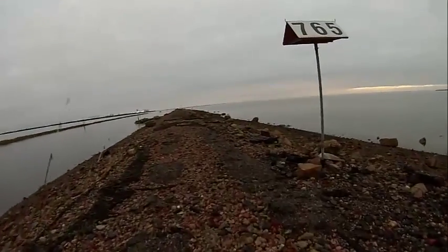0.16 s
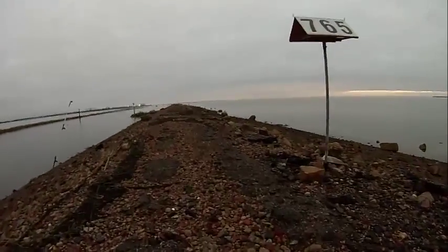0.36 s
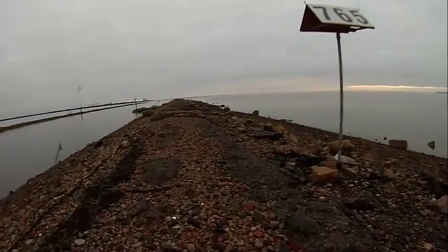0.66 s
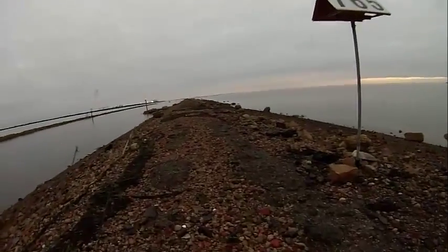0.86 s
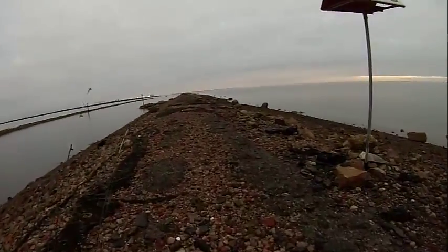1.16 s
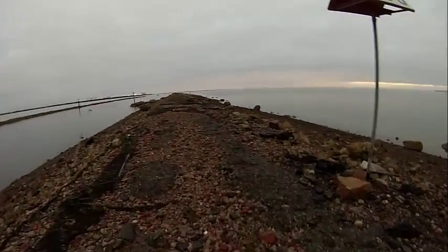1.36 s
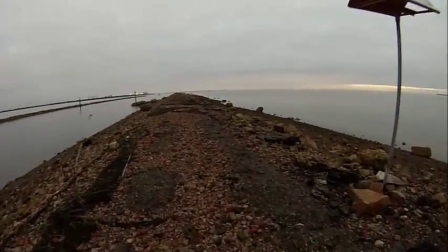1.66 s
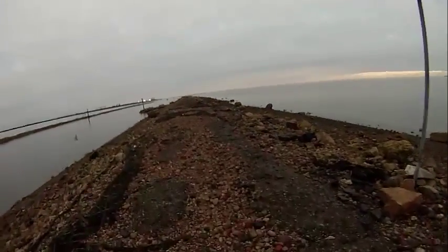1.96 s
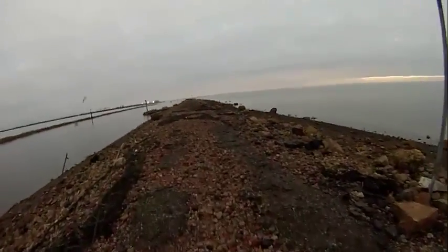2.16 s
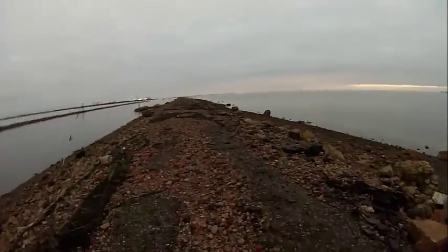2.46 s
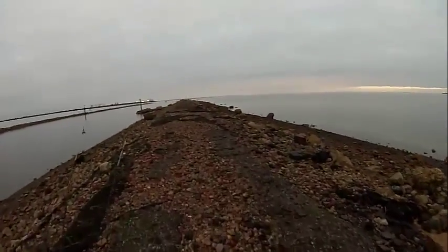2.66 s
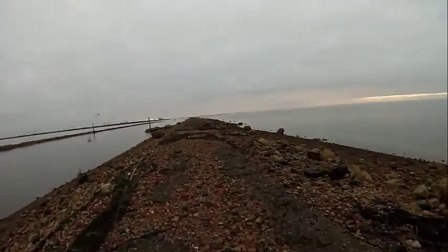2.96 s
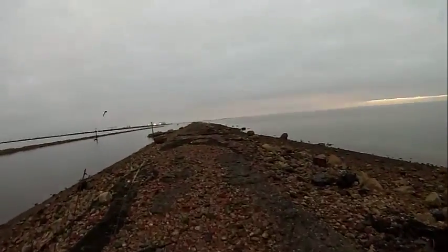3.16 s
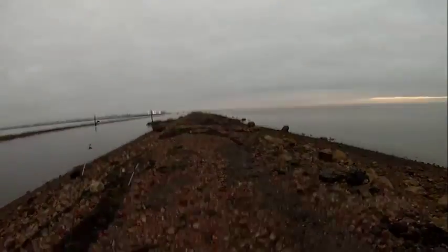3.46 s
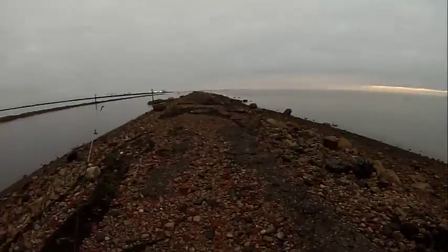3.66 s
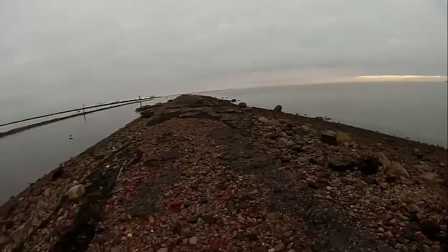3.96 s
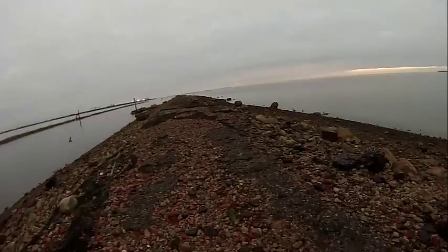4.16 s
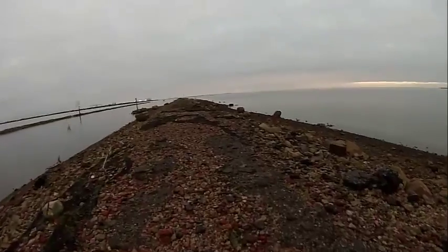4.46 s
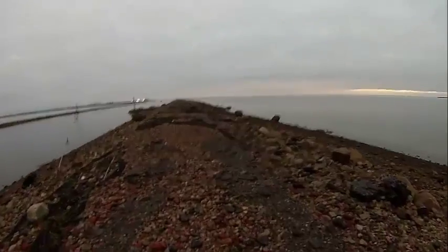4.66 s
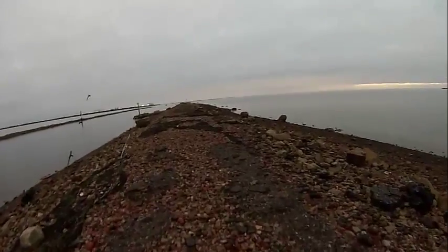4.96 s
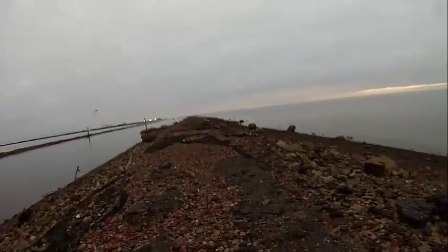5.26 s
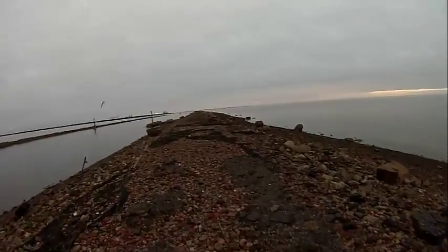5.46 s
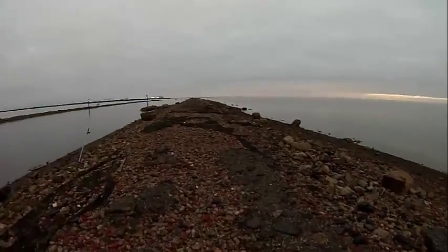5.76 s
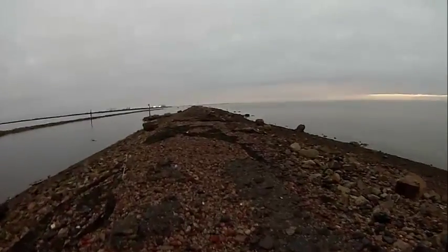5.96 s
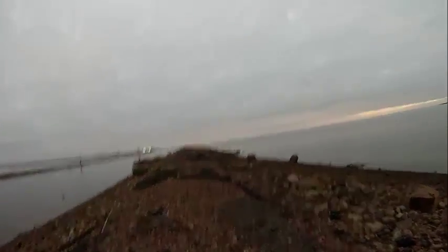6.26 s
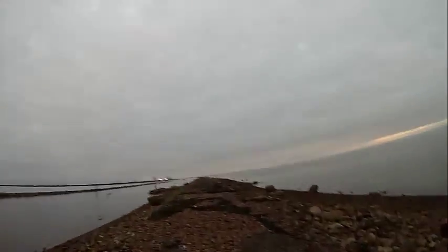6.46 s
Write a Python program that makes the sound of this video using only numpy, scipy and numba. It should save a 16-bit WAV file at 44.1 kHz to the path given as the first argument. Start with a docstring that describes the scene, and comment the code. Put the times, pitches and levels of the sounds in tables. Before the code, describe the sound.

Twelve or so even footsteps on loose stones outdoors, beside open water, picked up by a small camera in a closed case. Bass thuds dominate, uneven in strength, some soft and some overloading with a brief crackling flutter. Small boxy knocks, muted gravel crunches and tiny clinks ride on each one. A faint, nearly central hiss of wind, distant water and microphone noise lies underneath, ducking briefly on the strongest thuds.

```python
"""A gravel breakwater: someone walks along it with a small camera in a closed housing.
Each footfall swings the mount a few times far down in the bass, as decaying sines; the housing's resonances
dull the random stone clicks to a thin crunch, with short pitched rings over shaped-noise wind and hiss.
The limiter steps its gain down on the big swings: it chatters, the hiss ducks."""
import sys
import numpy as np
from scipy import signal
from scipy.fft import rfft, irfft
from scipy.io import wavfile
from scipy.ndimage import uniform_filter1d
from numba import njit

SR = 44100
rng = np.random.default_rng(int(sys.argv[2]) if len(sys.argv) > 2 else 0)


def file_out(sig):
    """Save sig as 16-bit WAV at sys.argv[1]."""
    # one column per channel
    cols = np.atleast_2d(sig).T
    # limit, then scale
    lim = np.clip(cols, -1, 1)
    pcm = np.round(lim * 32767).astype(np.int16)
    wavfile.write(sys.argv[1], SR, pcm)


N = 290927
TIME_S = np.arange(N) / SR

# Footfalls felt by the mount. Each row: time of the first swing in seconds, peak in dB, direction, swing in Hz,
# t60 in s, rise in ms, wind-up in dB relative to the swing, wind-up lead in ms.
FOOTFALLS = [(.253, -16, "+", 34.3, 0.089, 12.4, -37, 20), (0.8, -17, "-", 30.1, 0.26, 22, -6, 12),
             (1.369, -6.8, "-", 27.5, .125, 15, -24, 24), (1.931, -12, "-", 26.2, 0.071, 36, -18, 59.4),
             (2.4497, -8, "-", 26, .17, 11, -13, 28), (3.015, -16.5, "-", 24.6, 0.091, 39, -15.5, 44),
             (3.546, -6.5, "-", 27, .16, 14, -10.5, 16), (4.043, -18.5, "+", 46, 0.19, 14, -19, 20),
             (4.6364, -5.8, "-", 31, .23, 9, -16.6, 28), (5.2268, -7.3, "-", 29.3, .133, 15, -10.3, 13),
             (5.721, -8.1, "-", 28.5, .2, 13, -18, 12), (6.309, -16.5, "-", 28.7, 0.057, 56, -17, 76)]


def undb(db):
    """Amplitude factor of a level in dB."""
    return 10 ** (np.asarray(db) / 20)


def level(x, db):
    """Scale to an rms level in dB."""
    return x * undb(db) / np.sqrt(np.mean(x ** 2))


def band(x, hz, width_hz):
    """One resonance, gain 1 at its centre."""
    return signal.lfilter(*signal.iirpeak(hz, hz / width_hz, fs=SR), x)


def low(x, hz):
    """Soft low-pass, 12 dB an octave."""
    return signal.lfilter(*signal.butter(2, hz, fs=SR), x)


def add(out, sound, start_s):
    """Mix a sound in at a time."""
    i = max(int(start_s * SR), 0)
    out[i:i + len(sound)] += sound[:N - i]


def colour(table, hz):
    """Gain of a (Hz, dB) table, straight on a log-frequency axis."""
    at_hz, db = np.transpose(table)
    return undb(np.interp(np.log(hz + 1), np.log(at_hz), db))


def grains(rate_hz, spread_db):
    """Clicks at random times, a few much larger than the rest; rms 1."""
    chance = rng.random((3, N))
    struck = chance[0] < rate_hz / SR
    size = undb(-spread_db * np.log(1 - .995 * chance[1]))
    return level(struck * size * np.sign(chance[2] - .5), 0)


def mount():
    """Each footfall winds the mount up, then swings it hard the other way; lesser jolts come between."""
    # Lesser jolts. Each row: time of the first swing in seconds, peak in dB, direction, swing in Hz.
    jolts = [(0.312, -21.5, "+", 23), (0.37, -36, "-", 19), (.465, -37, "-", 17), (0.522, -42, "-", 34),
             (0.624, -33.5, "-", 18.6), (0.656, -36, "-", 37), (0.841, -16.5, "-", 26.7),
             (0.929, -29.5, "-", 20.4), (1.324, -29, "+", 56), (1.444, -24, "+", 24.6),
             (1.686, -30.5, "-", 29.6), (1.882, -38, "+", 42), (1.911, -26, "-", 24),
             (2.358, -32, "-", 24.6), (3.109, -28, "-", 21), (3.4, -30, "-", 22), (3.418, -25, "+", 34),
             (3.64, -24, "-", 19.6), (4.097, -24.5, "-", 37), (4.161, -23, "-", 19), (4.383, -42, "-", 28),
             (4.515, -35, "+", 33), (4.571, -32, "+", 23), (4.79, -29, "+", 21.7), (4.98, -38.5, "+", 32),
             (5.028, -34.5, "+", 27), (5.094, -30, "-", 28.6), (5.324, -27.5, "-", 23),
             (5.692, -30.5, "+", 42), (5.842, -29, "-", 18), (6.156, -30, "-", 20.4), (6.25, -28, "+", 23),
             (6.292, -23.5, "-", 24.3), (6.368, -33, "-", 19.8)]
    jolt_t60_s, jolt_rise_ms = .17, 8.2
    # the small opposite swing as the leg brakes
    wind_up_hz, wind_up_t60_s, wind_up_rise_ms = 34.42, .13, 11

    pushes = [(*jolt, jolt_t60_s, jolt_rise_ms) for jolt in jolts]
    for s, db, direction, hz, t60_s, rise_ms, wind_up_db, lead_ms in FOOTFALLS:
        opposite = "+" if direction == "-" else "-"
        pushes.append((s, db, direction, hz, t60_s, rise_ms))
        pushes.append((s - lead_ms / 1000, db + wind_up_db, opposite,
                       wind_up_hz, wind_up_t60_s, wind_up_rise_ms))

    out, t = np.zeros(N), TIME_S[:SR // 2]
    for s, db, direction, hz, t60_s, rise_ms in pushes:
        rise = (1 - np.exp(-1000 * t / rise_ms)) ** 2
        swing = np.sin(2 * np.pi * hz * t) * rise * 1000 ** (-t / t60_s)
        first_peak_s = np.argmax(swing[:int(SR / hz / 2)]) / SR
        sign = 1 if direction == "+" else -1
        add(out, sign * undb(db) * swing / np.abs(swing).max(), s - first_peak_s)
    return out


def sway(sway_db):
    """Small random shakes of the walking body keep the mount trembling, in surges."""
    surge_db = 3.0 * level(low(rng.standard_normal(N), 7), 0) - 2.0
    tremble = low(low(band(rng.standard_normal(N), 30, 27), 46), 60)
    return level(tremble, 0) * undb(sway_db + surge_db)


def weight():
    """Share 0-1 of the weight on the landing foot: on before the swing, rolling off after it."""
    load_s, unload_s = .036, .083
    late_s = TIME_S - np.array([[step[0]] for step in FOOTFALLS])
    return np.exp(-np.where(late_s < 0, -late_s / load_s, late_s / unload_s)).max(axis=0)


def knocks():
    """Dull, short rings of the housing; each spot favours the modes near its own pitch."""
    # Knocks on the housing. Each row: start in seconds, peak in dB, pitch favoured by the spot struck in Hz.
    strikes = [(0.256, -40, 110), (0.507, -41.5, 153), (.652, -50, 129), (0.815, -48, 190),
               (1.367, -38, 117), (1.371, -41, 182), (1.422, -27.5, 153), (1.762, -48, 135),
               (1.907, -48, 130), (1.91, -40, 300), (2.445, -40.5, 115), (2.456, -35, 297),
               (2.459, -40.5, 165), (2.476, -38, 132), (2.842, -54, 150), (3.042, -45, 190),
               (3.5376, -25.5, 271), (3.541, -29, 118), (3.636, -40, 118), (4.04, -50, 290),
               (4.061, -52, 118), (4.092, -46, 125), (4.154, -46.5, 125), (4.615, -48, 170),
               (4.632, -34.5, 126.6), (4.634, -35.5, 165), (5.222, -37.5, 112), (5.706, -45, 181),
               (5.718, -41, 124), (6.152, -49, 161), (6.407, -43.5, 130), (6.577, -44, 125)]
    # Low modes of the housing. Each row: pitch in Hz, relative level in dB, t60 in s.
    shell_modes = [(118, 0, 0.066), (132, 1.5, 0.032), (164.4, -6, 0.052), (296, 1.5, 0.012)]
    spot_db_per_octave = 21  # fall of the modes away from the favoured pitch

    out, t = np.zeros(N), TIME_S[:SR // 8]
    rise = 1 - np.exp(-t / .0022)
    for s, db, spot_hz in strikes:
        ring = np.zeros(len(t))
        for hz, mode_db, t60_s in shell_modes:
            mode_gain = undb(mode_db - spot_db_per_octave * abs(np.log2(hz / spot_hz)))
            ring += mode_gain * np.sin(2 * np.pi * hz * t) * 1000 ** (-t / t60_s)
        ring *= rise
        add(out, -undb(db) * ring / np.abs(ring).max(), s)
    return out


def rumble(load):
    """The housing rumbles under the weight: noise through one broad resonance."""
    return load * level(band(rng.standard_normal(N), 210, width_hz=210), -59)


def gravel(trickle_db):
    """Stone clicks, in bursts and as a trickle, ring the housing; sharp ones also pass as treble."""
    # Gravel crushed under the sole. Each row: start in seconds, relative level in dB,
    # decay time constant in ms, treble drive relative to the dull drive in dB.
    crunches = [(.2623, -62, 44, -25), (.781, -61, 12, -22), (.822, -56, 12, -23), (0.862, -61, 9.1, -22),
                (.9038, -56, 8.6, -24), (1.33, -53, 34, -23), (1.361, -48, 13, -18), (1.8634, -59, 9, -27),
                (1.9, -59, 10, -25), (1.909, -46.5, 8.9, -24.5), (2.418, -54.5, 24, -21),
                (2.445, -45, 13, -24), (2.6224, -61, 12, -18), (3.001, -56, 9.8, -22),
                (3.043, -56, 30, -20), (3.103, -51, 3.9, -22), (3.353, -54, 16, -22),
                (3.519, -56.5, 56, -25), (3.7793, -55, 15, -21), (4.027, -62, 11, -30),
                (4.036, -51.5, 18, -20.5), (4.051, -45.5, 4.1, -22), (4.627, -54, 10.4, -24),
                (4.635, -46, 3.5, -11), (4.753, -61, 33, -20), (4.8, -65, 17, -18), (4.845, -71, 70, -21),
                (5.203, -52, 6.5, -33), (5.216, -51, 26, -18), (5.716, -50, 7.3, -14.5),
                (5.733, -54, 12, -25), (5.7773, -60, 25, -20), (5.86, -63, 32, -21), (5.98, -63, 27, -25),
                (6.2894, -75, 12, -12)]
    # Housing resonances. Each row: centre in Hz, width in Hz, relative level in dB.
    housing_modes = [(1380, 290, 0), (2180, 250, -6.5), (2980, 2300, -22.5), (790, 1800, -5.5),
                     (353, 410, -1), (5300, 1400, -15.5)]

    # the trickle comes in uneven spurts
    flicker_db = 1.6 * level(low(rng.standard_normal(N), 3.7), 0)
    dull, bright, t = undb(trickle_db + flicker_db), np.zeros(N), TIME_S[:SR // 8]
    for s, db, decay_ms, bright_db in crunches:
        burst = (1 - np.exp(-t / .0015)) * np.exp(-1000 * t / decay_ms)
        add(dull, undb(db) * burst, s)
        add(bright, undb(db + bright_db) * burst, s)

    clicks = grains(5000, spread_db=3.0)
    dull_clicks = dull * clicks
    rings = sum(undb(db) * band(dull_clicks, hz, width_hz) for hz, width_hz, db in housing_modes)
    treble = band(band(bright * clicks, 3100, 6200), 3900, 6200)
    return undb(8.5) * low(rings, 3500) + undb(19) * treble


def short_rings():
    """Short pitched rings: clinks among the stones and, on the hardest swings, the limiter's chatter."""
    # Each row: start in seconds, peak of the envelope in dB, pitch in Hz.
    pitched = [(0.782, -53, 1410), (.793, -52, 1400), (.821, -54, 1280), (.829, -55, 1610),
               (.832, -58, 2050), (0.875, -55, 1150), (.904, -56, 1420), (1.12, -54, 1560),
               (1.3298, -51, 1130), (1.331, -55, 720), (1.338, -56, 1440), (1.344, -49, 1440),
               (1.348, -62, 2410), (1.356, -64, 2340), (1.367, -59, 4530), (1.367, -41, 1380),
               (1.367, -48, 900), (1.381, -47, 1760), (1.395, -55, 2460), (1.423, -66, 2490),
               (1.903, -50, 750), (1.9105, -50, 2420), (1.912, -51, 1360), (1.919, -57, 2400),
               (2.455, -56, 2280), (2.479, -56, 2500), (2.623, -57, 2480), (3.003, -50, 1500),
               (3.054, -53, 1470), (3.356, -56, 1390), (3.39, -51, 560), (3.527, -51, 1390),
               (3.539, -53, 627), (3.5428, -52.5, 2570), (3.543, -53, 5150), (3.5425, -59, 7700),
               (3.55, -57, 3830), (3.552, -48.5, 2360), (3.572, -54, 2500), (4.03, -54, 1460),
               (4.036, -51, 844), (4.041, -47, 1420), (4.042, -58, 4620), (4.0532, -50, 2360),
               (4.051, -58, 5120), (4.052, -50, 1480), (4.054, -50, 1140), (4.054, -57, 4090),
               (4.057, -54, 3010), (4.557, -54, 1500), (4.633, -48, 725), (4.6354, -43, 1880),
               (4.636, -51, 3720), (4.648, -46, 1590), (4.765, -56, 2300), (4.833, -56.5, 2450),
               (5.203, -48.5, 1440), (5.2049, -52, 2210), (5.225, -51, 5570), (5.225, -53, 2600),
               (5.7195, -42.5, 970), (5.72, -52, 560), (5.72, -49.5, 1250), (5.721, -57, 2060),
               (5.734, -46.5, 960), (5.749, -54, 1390), (5.788, -54, 1550), (5.798, -55, 1540),
               (5.804, -58, 2260), (5.997, -52.5, 1530), (6.285, -57, 2320), (6.298, -53, 1500),
               (6.556, -58, 2080)]
    rise_ms, t60_ms = .4, 29

    out, t = np.zeros(N), TIME_S[:SR // 16]
    ms = 1000 * t
    shape = (1 - np.exp(-ms / rise_ms)) * 1000 ** (-ms / t60_ms)
    shape /= shape.max()
    for (s, db, hz), phase_turns in zip(pitched, rng.random(len(pitched))):
        add(out, undb(db) * shape * np.sin(2 * np.pi * (hz * t + phase_turns)), s)
    return out


def hiss():
    """Far water, wind and the microphone's own noise as shaped noise, mostly alike in both channels."""
    # Spectrum of the mid. Each row: frequency in Hz, relative density in dB per Hz.
    mid_spectrum = [(60, -20.5), (114, -16), (438, -26), (1180, -30.5), (2350, -35), (5000, -40),
                    (10700, -48.5), (13300, -48)]
    # Stereo width. Each row: frequency in Hz, side relative to mid in dB.
    side_spectrum = [(100, -49), (200, -34.5), (350, -25.5), (700, -21.5), (1400, -22.5), (2800, -13),
                     (5000, -11), (9000, -8.5), (11000, -18)]

    hz = np.fft.rfftfreq(N, 1 / SR)
    bass_cut = np.minimum(hz / 60, 1) ** 2
    mid, side = rfft(rng.standard_normal((2, N))) * colour(mid_spectrum, hz) * bass_cut
    side = side * colour(side_spectrum, hz)
    return level(irfft(np.array([mid + side, mid - side]), N), -59)


def scene():
    """Swings, knocks and stones follow the steps; hiss lies under all."""
    # Between footfalls. Each row: time in seconds, relative level of the stone trickle in dB,
    # relative level of the sway in dB.
    s, *columns = np.transpose([(0, -67.5, -41.5), (.55, -67, -43.5), (1.1, -66, -43.5), (1.65, -67, -44.5),
                                (2.2, -63.5, -43.5), (2.8, -67.5, -45), (3.3, -65.5, -44),
                                (3.85, -66, -43.5), (4.4, -65.5, -49), (4.95, -65, -45.5),
                                (5.451, -64.5, -46.5), (6.0, -66, -46.5), (6.6, -63, -43)])
    trickle_db, sway_db = (np.interp(TIME_S, s, column) for column in columns)
    load = weight()
    loaded_trickle_db, loaded_sway_db = .5, 8  # added under the full weight

    body = mount() + sway(sway_db + loaded_sway_db * load) + knocks() + rumble(load)
    crunch = gravel(trickle_db + loaded_trickle_db * load)
    return body + crunch + short_rings() + hiss()


@njit
def limiter(peak, top, step, attack, hold, release):
    """Over the top the gain falls in equal steps, the quicker the larger the excess; after a hold it climbs back."""
    gain, down, wait, due = np.empty(len(peak)), 0., 0., 0.
    for i in range(len(peak)):
        over = peak[i] * step ** down / top
        if over > 1:
            due, wait = due + over ** 3 / attack[i], hold
            if due > 1:
                down, due = down + 1, 0.
        wait -= 1
        if wait < 0 and down > 0:
            down, wait = down - 1, release[i]
        gain[i] = step ** down
    return gain


def record(dry):
    """Each channel's limiter sees the sound a moment late, in its own uneven time; treble droops, the top is cut."""
    top, step_db = .27, -.45
    attack_s, release_s, holds_s = .0012, .007, (.0088, .0062)  # holds: left, right
    seen = np.roll(np.abs(dry), int(.0015 * SR), axis=1)
    jitter = uniform_filter1d(rng.standard_normal((2, N)), 25, axis=1) * np.sqrt(25)
    pace = SR * (1 + .16 * jitter)  # uneven samples per second
    gain = [limiter(x, top, float(undb(step_db)), attack_s * p, hold_s * SR, release_s * p)
            for x, p, hold_s in zip(seen, pace, holds_s)]
    gain = uniform_filter1d(gain, size=3, axis=1)

    # the amplifiers sit a little off zero, so every step also thuds, oppositely left and right, and drains away
    offset = np.array([[-.017], [.017]])
    thud = signal.lfilter(*signal.butter(1, 18, "high", fs=SR), (gain - 1) * offset)
    drooped = signal.sosfilt(signal.butter(8, 12200, fs=SR, output="sos"), gain * dry + thud)
    return signal.sosfilt(signal.ellip(8, .2, 70, 14600, fs=SR, output="sos"), drooped)


dry = scene()
out = record(dry)
file_out(out)
```